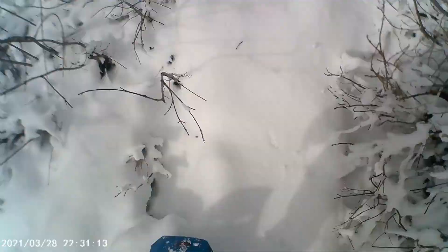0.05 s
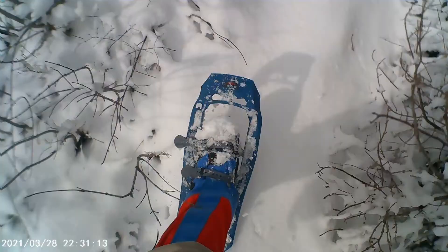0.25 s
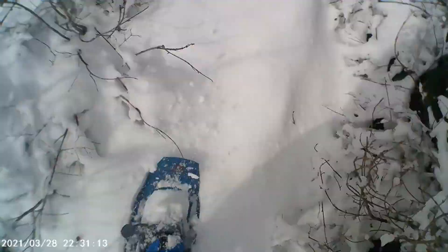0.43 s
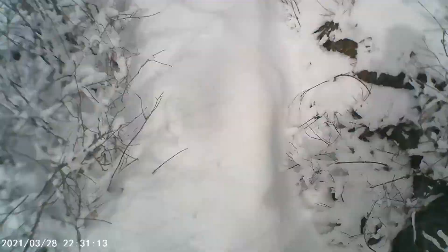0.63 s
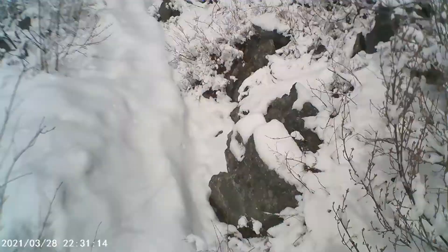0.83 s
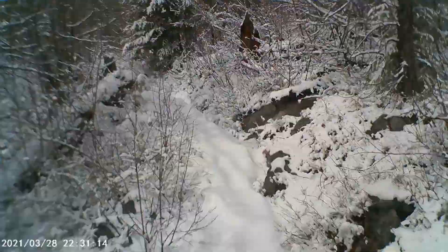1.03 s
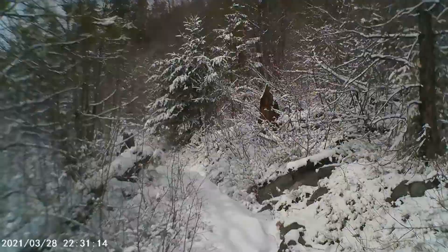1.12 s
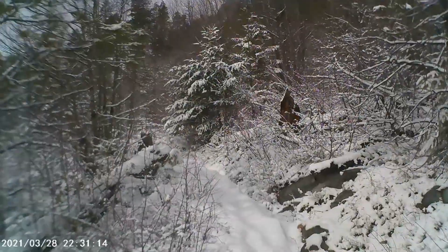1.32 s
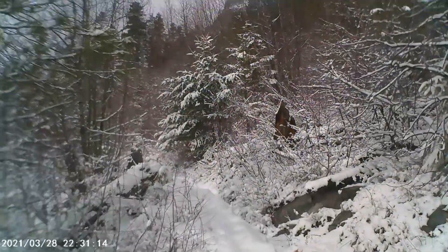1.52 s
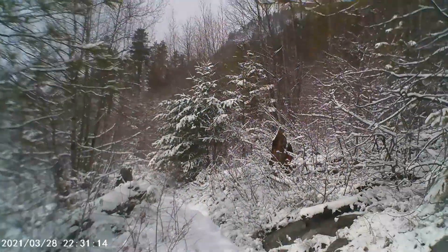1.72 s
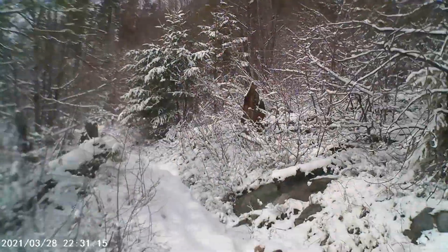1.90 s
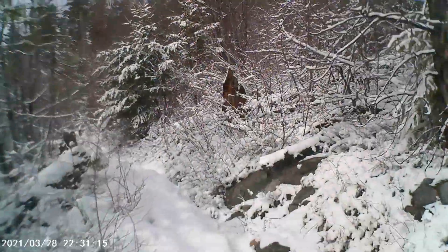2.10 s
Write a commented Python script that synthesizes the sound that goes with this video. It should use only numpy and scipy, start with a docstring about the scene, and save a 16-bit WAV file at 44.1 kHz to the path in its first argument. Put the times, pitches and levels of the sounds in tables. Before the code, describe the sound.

Snowshoes crunch through soft snow in three close, dry steps. The first lands at about 0.25 seconds with a dull thud, a plastic clack and a brief snow squeak. Powder swishes as the shoe swings, and the second step packs down from 0.9 to 1.2 seconds. Another swish at 1.5 leads into the third, until 1.9. Ice crust and bindings tick throughout over faint hiss and slight wind rumble.

```python
"""Three snowshoe steps in soft snow, heard from just above the walker, in a quiet wood.
Each shoe swishes through powder, lands, and packs the snow in dull thuds and a grainy crunch.
On the first step the plastic deck clacks and the cold snow squeaks under the weight.
Ice crust and bindings tick; faint wind rumbles on the microphone over outdoor hiss."""
import sys
import numpy as np
from scipy import signal
from scipy.fft import rfft, irfft, next_fast_len
from scipy.io import wavfile
from scipy.ndimage import map_coordinates

SR = 44100
rng = np.random.default_rng(int(sys.argv[2]) if len(sys.argv) > 2 else 0)


def persist_wave(psi):
    """Save psi, clipped to +-1, as 16-bit WAV."""
    counts = np.round(np.clip(psi, -1, 1) * 32767).astype(np.int16)
    wavfile.write(sys.argv[1], SR, np.atleast_2d(counts).T)


N = 94815

# spectrum of crisp snow crystals: (frequency [Hz], relative density [dB])
CRISP_SPECTRUM = [(700, -18), (1700, 3.5), (2400, -2), (2900, -5.5), (3700, 0), (4300, -17), (5200, -11.5),
                  (5700, -17.5), (7000, -18)]


def amp(db):
    """Decibels to gain."""
    return 10 ** (np.asarray(db) / 20)


def unit(x):
    """x at rms 1."""
    return x / np.sqrt(np.mean(x ** 2) + 1e-20)


def clock():
    """Time of every sample [s]."""
    return np.arange(N) / SR


def wobble(rate_hz):
    """Smooth random curve, rate_hz knots a second."""
    return map_coordinates(rng.standard_normal(int(N * rate_hz / SR) + 4), [clock() * rate_hz])


def coloured(x, spectrum):
    """x through a minimum-phase filter of shape (frequency [Hz], gain [dB]), at rms 1."""
    m = 2 * next_fast_len(N)
    hz, db = np.transpose(spectrum)
    gain = amp(np.interp(np.log(np.fft.rfftfreq(m, 1 / SR) + 1), np.log(hz), db))
    cepstrum = irfft(np.log(gain), m)
    cepstrum[1:m // 2] *= 2
    cepstrum[m // 2 + 1:] = 0
    return unit(irfft(rfft(x, m) * np.exp(rfft(cepstrum)), m)[:N])


def grains(rate_hz, spectrum, spread_db, bed_db):
    """Snow crystals breaking at random, over a bed of finer ones."""
    breaks = rng.random(N) < rate_hz / SR
    sizes = amp(spread_db * rng.uniform(-1.1, 1, N)) * np.sign(rng.standard_normal(N))
    return coloured(unit(breaks * sizes) + amp(bed_db) * rng.standard_normal(N), spectrum)


def swells(rows):
    """Power sum of bell envelopes: (centre [s], half width [s], level [dB])."""
    t = clock()
    return np.sqrt(sum(amp(db) ** 2 * np.exp(-2 * ((t - s) / width_s) ** 2) for s, width_s, db in rows))


def add(track, start_s, sound):
    """Mix sound into track at start_s."""
    part = track[round(start_s * SR):][:len(sound)]
    part += sound[:len(part)]


def air():
    """Faint fluttering outdoor hiss; wind on the microphone as the walker moves."""
    # spectra: (frequency [Hz], relative density [dB])
    hiss_spectrum = [(20, -4.5), (60, -5), (150, -4), (400, -5), (800, -6.5), (1300, -7), (2200, -18),
                     (3700, -19), (5000, -21.5), (7000, -28.5)]
    wind_spectrum = [(15, -27), (40, 15.5), (70, -2.5), (120, 0.5), (300, -58)]
    # wind gusts: (centre [s], half width [s], level [dB])
    gusts = [(.22, 0.07, -65), (.46, 0.16, -59), (.94, 0.019, -55)]
    hiss_db, flutter_db = -59, 1.1
    hiss = amp(hiss_db + flutter_db * wobble(45.2)) * coloured(rng.standard_normal(N), hiss_spectrum)
    wind = swells(gusts) * coloured(rng.standard_normal(N), wind_spectrum)
    return hiss + wind


def swish():
    """The swinging shoe sweeps powder, snaps crystals, scrapes the crust and skims dry snow."""
    # sweeps through powder: (centre [s], half width [s], level [dB], crystals re powder [dB])
    sweeps = [(.02, 0.011, -54, -26), (.11, 0.069, -64, 3), (0.486, 0.015, -54, 6.5),
              (.6, 0.26, -60.5, -13), (0.841, 0.087, -56.5, -2.5), (0.979, 0.13, -57.5, -12),
              (1.221, 0.094, -59.5, -12), (1.474, 0.047, -49, -10), (1.563, 0.026, -50, -15),
              (2.03, 0.078, -64, -17)]
    # deck edge scraping, deck skimming: (centre [s], half width [s], level [dB])
    scrapes = [(.487, 0.0065, -43), (.507, 0.017, -43.5)]
    skims = [(.468, 0.034, -55.5), (.779, .015, -53), (.812, 0.019, -59), (1.46, 0.028, -56.5)]
    # spectra: (frequency [Hz], relative density [dB])
    powder_spectrum = [(80, -45.5), (250, 6.5), (600, 12), (1250, 11), (1800, 5.5), (2300, -1.5),
                       (3700, -3.5), (4600, -9), (7000, -19.5)]
    scrape_spectrum = [(500, -26), (1100, -19), (1500, 7), (1850, 4), (2300, -5), (3200, -7.5),
                       (7000, -30.5)]
    skim_spectrum = [(1200, -23), (2600, 0.5), (3500, 4), (4500, -2), (7000, -20)]
    grain_rate_hz = 1800
    loose = grains(grain_rate_hz, powder_spectrum, spread_db=1.5, bed_db=-16.5)
    crackle = amp(-1) * grains(200, powder_spectrum, spread_db=10.5, bed_db=-22.5)
    powder = swells([row[:3] for row in sweeps]) * (loose + crackle)
    crystal_envelope = swells([(s, width_s, db + crisp_db) for s, width_s, db, crisp_db in sweeps])
    crystals = crystal_envelope * grains(220, CRISP_SPECTRUM, spread_db=7, bed_db=-7)
    scrape = swells(scrapes) * grains(grain_rate_hz, scrape_spectrum, spread_db=4, bed_db=-14)
    skim = swells(skims) * coloured(rng.standard_normal(N), skim_spectrum)
    flicker = unit(amp(3.1 * wobble(90)))
    return (powder + crystals + scrape) * flicker + skim


def ticks():
    """Ice crust and bindings tick, and once the deck rings: each a noise burst in one resonance, muffled by
    snow."""
    # hard cracks, and the deck's narrow ring at 1.791 s: (time [s], level [dB], t60 [s], centre [Hz], bandwidth
    # / centre [1])
    cracks = [(.113, -37, .012, 1310, 0.19), (.259, -33, 0.039, 2680, 1),
              (0.538, -26.5, 0.0068, 1100, 0.15), (.544, -31.5, 0.02, 990, 0.12),
              (0.634, -41, 0.017, 2400, 1), (.709, -40, 0.025, 870, 0.25),
              (0.727, -45.5, 0.017, 4300, 0.14), (0.819, -39.5, 0.013, 2700, 0.38),
              (.933, -35, 0.019, 1270, 0.14), (.987, -38, 0.02, 3615, .012),
              (1.106, -36.5, 0.02, 3470, 0.12), (1.107, -36.5, 0.017, 4500, 0.071),
              (1.107, -33.5, 0.045, 1560, 0.33), (1.124, -35.5, 0.01, 3800, 0.071),
              (1.131, -29.5, 0.0062, 2720, 0.32), (1.203, -33, 0.012, 1290, 0.091),
              (1.415, -29, 0.0086, 1180, 0.16), (1.461, -30.5, 0.0067, 1270, 0.37),
              (1.4751, -32.5, 0.011, 1320, 0.3), (1.561, -43, .01, 1510, .6),
              (1.57, -39, 0.0039, 1890, 0.45), (1.6212, -43.5, 0.017, 3630, .2),
              (1.643, -23, 0.0025, 1480, 0.3), (1.695, -33.5, 0.013, 2140, 0.74),
              (1.791, -46, 0.11, 3680, 0.034), (1.858, -40, 0.019, 1915, 0.96),
              (1.996, -50, 0.019, 1720, 0.19)]
    rise_s, muffle_hz = 0.0006, 5100
    out, t = np.zeros(N), np.arange(SR // 16) / SR
    f = np.fft.rfftfreq(len(t), 1 / SR)
    for start_s, db, t60_s, hz, width in cracks:
        damping = 1j * f * hz * width
        response = damping / (hz * hz - f * f + damping) / (1 + (f / muffle_hz) ** 4)
        noise = irfft(rfft(rng.standard_normal(len(t))) * response, len(t))
        envelope = amp(-60 * t / t60_s) * (1 - np.exp(-t / rise_s))
        rms = amp(db) * np.sqrt(np.mean(envelope ** 2))
        add(out, start_s, rms * unit(envelope * noise))
    return out


def crunch():
    """Weight packs the snow in strokes; each breaks grains in three sizes."""
    # strokes: (start [s], length [s], swell over stroke [dB], body [dB], crunch [dB], crisp [dB])
    presses = [(0.232, 0.059, -3.5, -48, -49, -53), (0.294, 0.026, 6, -39, -33.5, -44.5),
               (0.326, 0.026, 3, -43, -36.5, -53), (0.363, 0.052, 2.5, -45, -51, -52.5),
               (0.419, 0.026, 8, -39.5, -43.5, -53), (0.453, 0.1, -2, -51, -49.5, -65.5),
               (0.931, 0.018, -6.5, -51, -45.5, -57), (1.026, 0.1, 4.5, -50.5, -54, -61),
               (1.112, 0.024, 5.5, -40.5, -45, -50), (1.148, 0.021, 13, -50, -53.5, -72),
               (1.195, 0.03, -3.5, -49.5, -51.5, -86), (1.375, 0.013, 2.5, -59.5, -51.5, -69),
               (1.597, 0.008, -9, -51, -47, -50.5), (1.717, 0.016, -4, -46, -42.5, -54.5),
               (1.746, 0.031, 8, -47, -47.5, -59.5), (1.78, 0.024, -1.5, -50, -38, -53.5),
               (1.801, 0.025, 4.5, -44.5, -42, -63)]
    # grain spectra: (frequency [Hz], relative density [dB])
    body_spectrum = [(40, -30), (90, -10.5), (140, -8.5), (240, -5.5), (480, -5), (700, -13.5),
                     (1200, -39.5), (3000, -75)]
    crunch_spectrum = [(200, -30.5), (500, -0.5), (800, -1.5), (1100, 0), (1350, 1), (1600, -8),
                       (1850, -14), (2200, -18.5), (4000, -27), (7000, -38)]
    attack_s, release_s = 0.0019, 0.011
    t, power = clock(), np.zeros((3, N))
    for start_s, length_s, swell_db, *levels_db in presses:
        age_s = t - start_s
        gate = np.clip(age_s / attack_s, 0, 1) * np.exp(-np.maximum(age_s - length_s, 0) / release_s)
        swell = amp(swell_db * (np.clip(age_s / length_s, 0, 1) - 0.5))
        power += (amp(levels_db)[:, None] * gate * swell) ** 2
    layers = np.array([grains(600, body_spectrum, spread_db=8, bed_db=-16),
                       grains(1800, crunch_spectrum, spread_db=5, bed_db=-9.5),
                       grains(1700, CRISP_SPECTRUM, spread_db=10.5, bed_db=-1.5)])
    flicker = unit(amp(2.5 * wobble(130)))
    return flicker * np.sum(np.sqrt(power) * layers, axis=0)


def thuds():
    """Snow collapses under the deck: a few low cycles over a soft push, with grit on top."""
    # snow pockets giving way: (time [s], level [dB], pitch [Hz], grit re tone [dB])
    pockets = [(0.239, -30, 520, -8), (.25, -33.5, 252, -36), (.259, -23, 241, 0.5),
               (0.446, -27.5, 245, -9), (.634, -40, 680, -2.5), (.864, -44.5, 630, 0),
               (0.9824, -30.5, 353, -8), (1.0588, -27, 305, -14.5), (1.113, -34, 372, -7.5),
               (1.129, -32, 172, -32), (1.149, -30, 268, -20), (1.164, -48, 332, -14),
               (1.399, -43.5, 775, -4), (1.422, -43, 252, -15), (1.608, -27, 324, -4.5),
               (1.655, -32, 509, -5.5), (1.701, -33.5, 501, -1.5), (1.702, -35, 122.6, -19),
               (1.7806, -22, 413, -15), (1.857, -29.5, 471, -7), (1.857, -38, 236, -22)]
    # grit: (frequency [Hz], relative density [dB])
    grit_spectrum = [(100, -26), (300, -14), (600, 3), (1200, 5.5), (1700, -2.5), (2300, -18.5),
                     (3800, -24.5), (7000, -44.5)]
    rise_s, steepness, t60_s = 0.0036, 4.13, 0.029
    push_hz, push_db = 180, -9.5
    highpass_hz = 148  # the shoe radiates little below this
    out, t = np.zeros(N), np.arange(SR // 16) / SR
    grit = grains(3000, grit_spectrum, spread_db=1.5, bed_db=-6.5) / np.sqrt(2)  # rms of a sine
    wander_rad = 0.36 * wobble(450)
    envelope = (1 - np.exp(-(t / rise_s) ** steepness)) * amp(-60 * t / t60_s)
    envelope /= envelope.max()
    push = amp(push_db) * np.sin(2 * np.pi * push_hz * t)
    for start_s, db, hz, grit_db in pockets:
        span = round(start_s * SR) + np.arange(len(t))
        tone = np.sin(2 * np.pi * hz * t + wander_rad[span])
        add(out, start_s, amp(db) * envelope * (tone + push + amp(grit_db) * grit[span]))
    return signal.sosfilt(signal.butter(2, highpass_hz, "highpass", fs=SR, output="sos"), out)


def clack():
    """The plastic deck slaps down once and rings briefly."""
    # deck modes: (frequency [Hz], relative level [dB], t60 [s])
    modes = [(764, -24.5, .04), (1300, 2, 0.023), (1656, -12.5, 0.018), (1770, -24, 0.016)]
    start_s, gain_db, rise_s = 0.2615, -14.5, 0.00091
    t = np.maximum(clock() - start_s, 0)
    ring = sum(amp(db - 60 * t / t60_s) * np.sin(2 * np.pi * hz * t) for hz, db, t60_s in modes)
    return amp(gain_db) * (1 - np.exp(-t / rise_s)) * ring


def squeak():
    """Cold snow sticks and slips under the deck; the ragged rate creeps up as it packs, then falls."""
    # stick-slip contour: (time [s], level [dB], pitch [Hz])
    contour = [(0.295, -49, 999), (.299, -33, 1017), (0.316, -32.5, 1107), (0.331, -40, 1214),
               (0.358, -34, 1175), (0.362, -45.5, 1286), (.381, -38.5, 1192), (.398, -50, 1000)]
    wander_rad, roughness_db = 1.46, -1
    knots_s, db, hz = np.transpose(contour)
    t = clock()
    phase = 2 * np.pi * np.cumsum(np.interp(t, knots_s, hz)) / SR + wander_rad * wobble(520)
    envelope = amp(np.interp(t, knots_s, db)) * (t > knots_s[0]) * (t < knots_s[-1])
    return envelope * unit(amp(roughness_db * wobble(300)) * np.sin(phase))


def scene():
    """Mono mix, close and dry: snow gives no echo."""
    return (crunch() + squeak() + swish() + thuds() + ticks() + clack() + air())[None]


def record(dry):
    """Steep zero-phase low-pass."""
    cutoff_hz = 7020
    m = 2 * next_fast_len(N)
    gain = 1 / np.sqrt(1 + (np.fft.rfftfreq(m, 1 / SR) / cutoff_hz) ** 110)
    return irfft(rfft(dry, m) * gain, m)[:, :N]


dry = scene()
out = record(dry)
persist_wave(out)
```